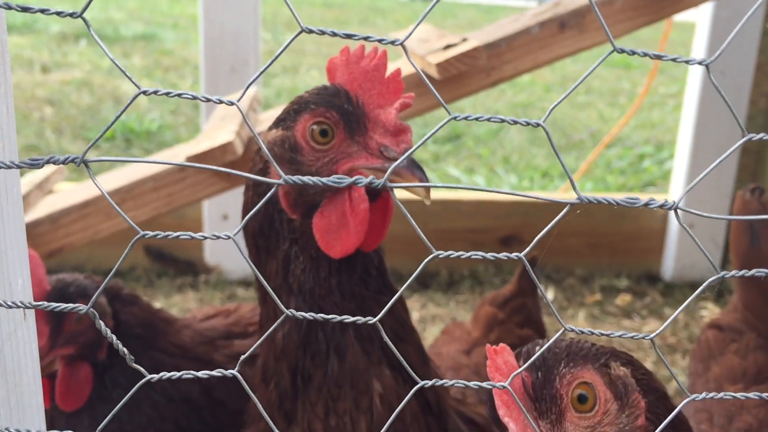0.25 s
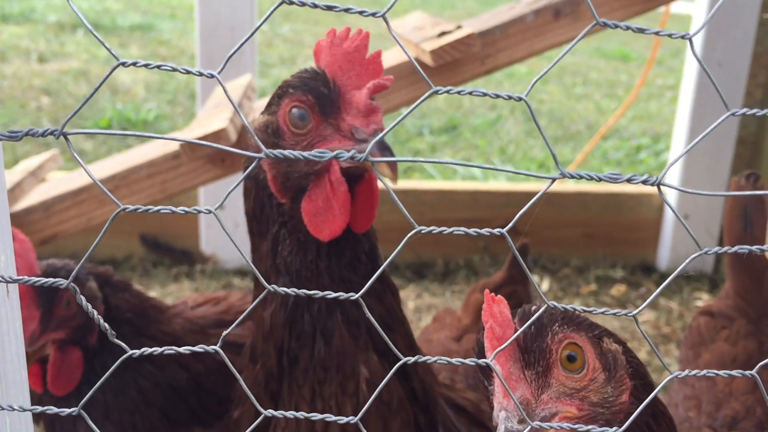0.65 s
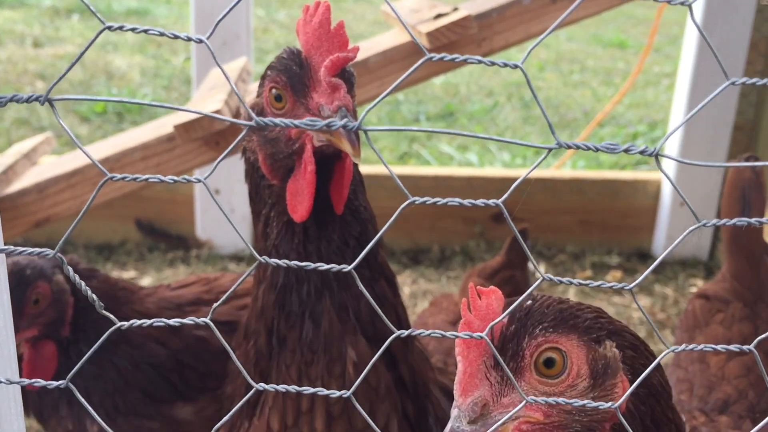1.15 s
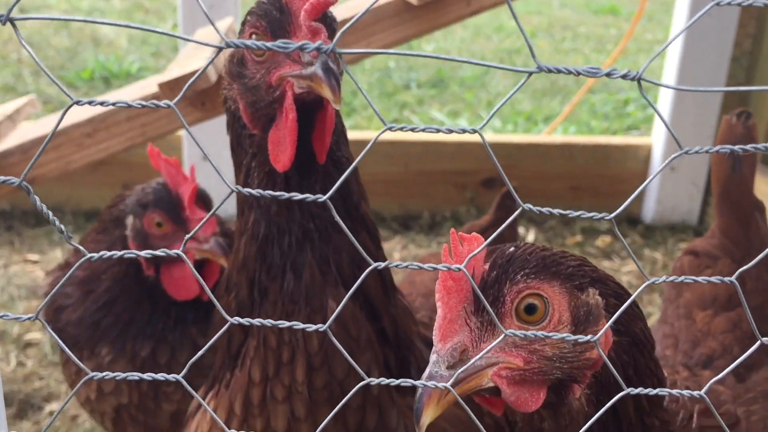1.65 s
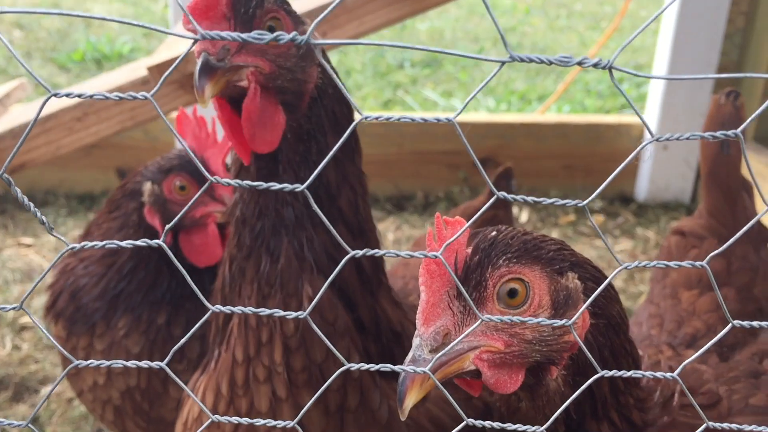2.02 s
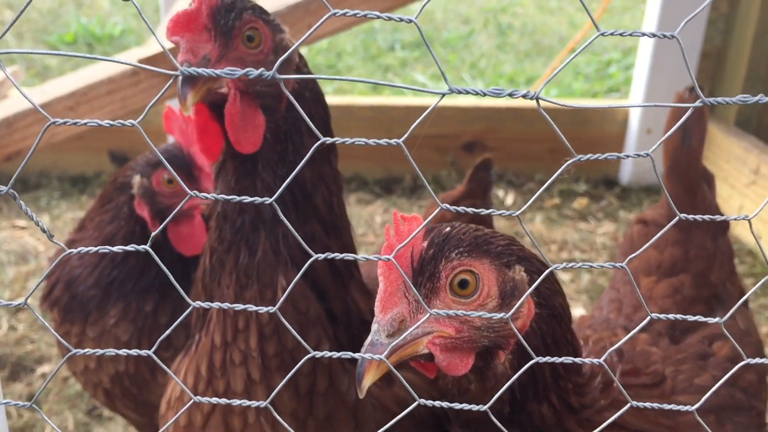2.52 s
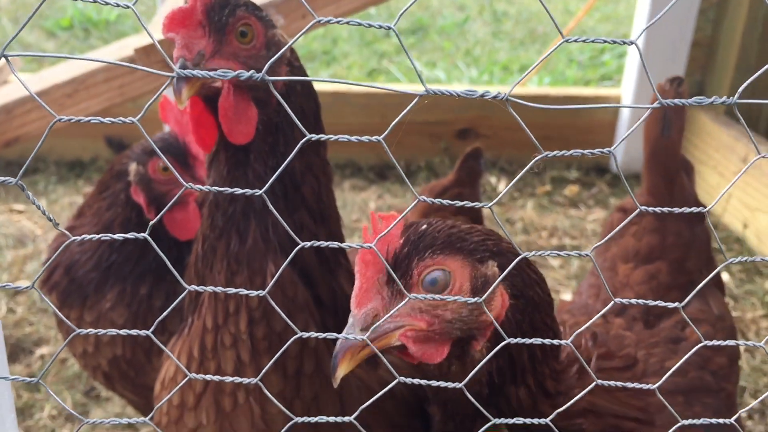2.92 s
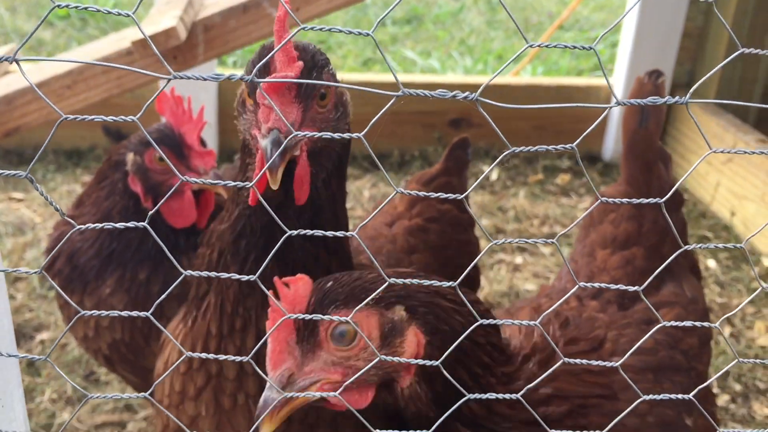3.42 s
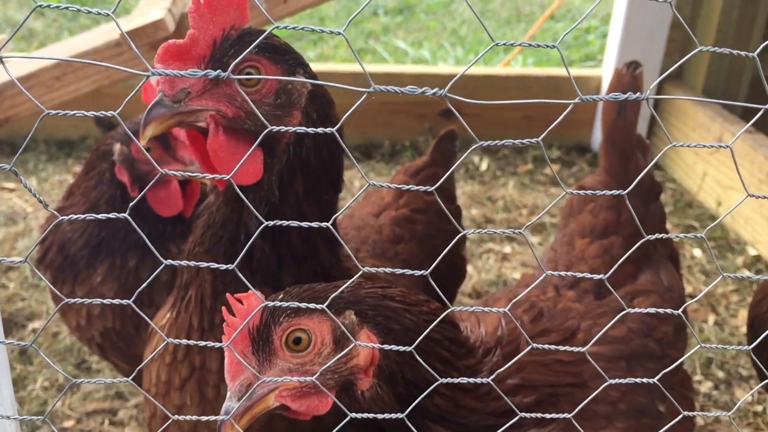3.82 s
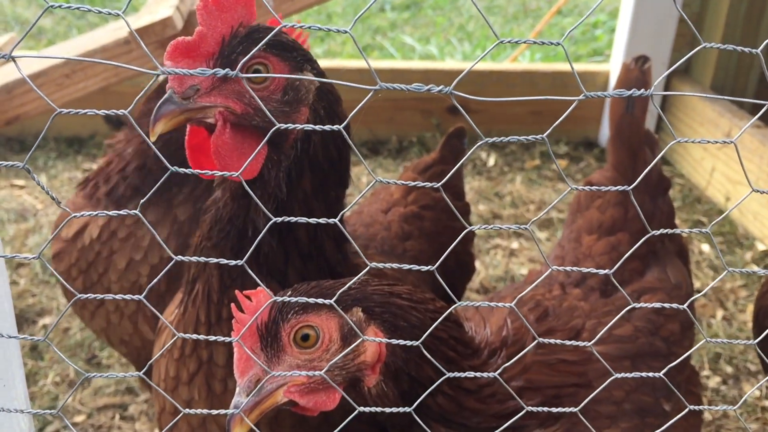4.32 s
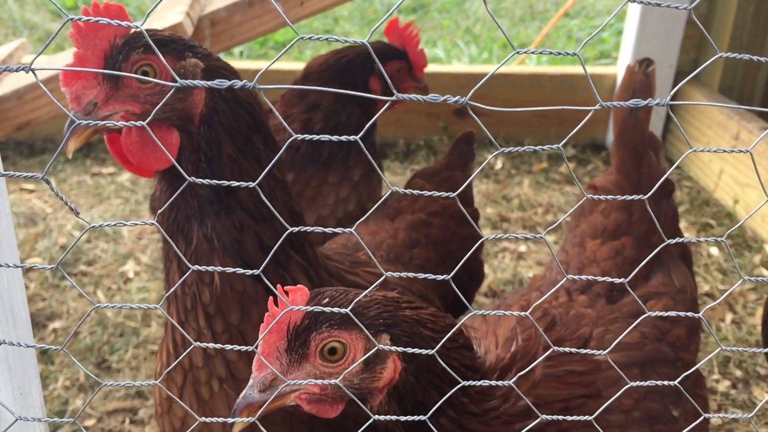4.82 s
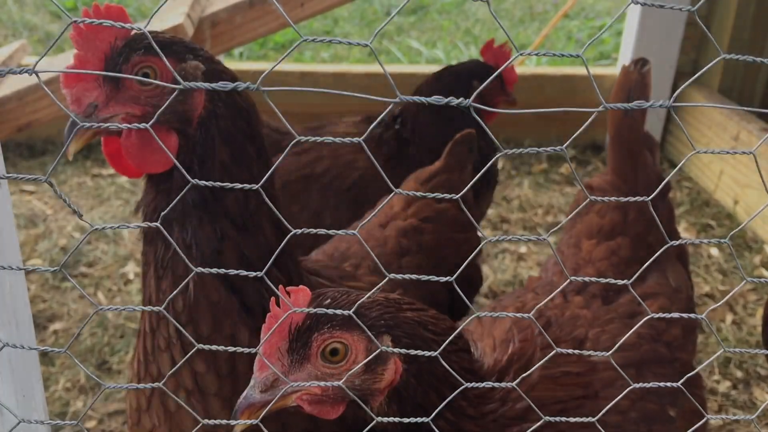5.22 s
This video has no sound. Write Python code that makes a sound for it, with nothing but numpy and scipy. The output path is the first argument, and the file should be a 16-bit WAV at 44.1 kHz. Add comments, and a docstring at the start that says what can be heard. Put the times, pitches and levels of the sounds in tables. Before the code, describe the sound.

Outdoors, close to several hens, a hand-held recorder is knocked with a quick cluster of low thumps. Hoarse, rattling croaks with whining tones fill the first two seconds, with rustling and small ticks, ending in a click and a loud short cluck. Then it grows quieter: a thin wavering whine and soft low clucks. A cricket chirps at a steady beat over faint insect hiss, light wind and a distant engine drone.

```python
"""An outdoor run: hens croak, cluck and whine close by, and the hand-held recorder is bumped at the start.
Hoarse pulses excite throat resonances for the croaks and clucks; gliding tones sing the notes and whine.
A cricket chirps in gated sine pulses at a steady beat over a far insect chorus of coloured noise.
Feathers and litter rustle and tick in noise grains and short rings; swelling low noise makes light wind
on the microphone, and a wavering tone with rumble makes the low drone of a distant engine."""
import sys
import numpy as np
from scipy import signal
from scipy.io import wavfile
from scipy.ndimage import uniform_filter1d

SR = 44100
rng = np.random.default_rng(int(sys.argv[2]) if len(sys.argv) > 2 else 0)


def wav_out(sig):
    """Save sig, one row per channel (or a flat mono array), as 16-bit PCM at SR to the path in sys.argv[1]."""
    wavfile.write(sys.argv[1], SR, np.round(np.clip(np.atleast_2d(sig).T, -1, 1) * 32767).astype(np.int16))


def gain_from_decibels(decibels):
    """Convert decibel values to linear amplitude factors."""
    exponent = np.asarray(decibels, float) / 20
    return 10 ** exponent


N = 241050  # samples in the scene

# hoarse croaks, one list each: (time [s], effort [dB], beak opening [0-1], upper resonance [Hz])
CROAK_PATHS = [
    [(0.0, -45.5, 0.89, 1435), (.18, -55, .6, 1414), (.366, -42.5, 0.6, 1400), (.4, -53, 0.96, 1480),
     (.444, -37.5, 0.38, 1382), (.88, -37, 0.63, 1520), (.93, -92, 0.6, 1530)],
    [(1.12, -54, 0, 1540), (1.174, -45.5, 0.4, 1580), (1.224, -43, 0.45, 1510), (1.4, -42.5, 0.76, 1493),
     (1.564, -41, 0.87, 1563), (1.6, -50, 0, 1480)],
    [(1.66, -49, .05, 1550), (1.71, -47, 0, 1530), (1.745, -43, 0, 1550), (1.77, -48, .2, 1580)],
    [(1.885, -42, 0.4, 1050), (1.92, -44, 0.52, 1190), (1.945, -47, 0.3, 1200)],
]
# upper throat resonances, for an upper resonance of 1450 Hz:
# (frequency [Hz], nominal width [Hz], relative level [dB])
BEAK_RESONANCES = [(2600, 190, 5), (3000, 98, -0.5), (3533, 190, 3.5), (3790, 330, 1)]
LOW_HZ, MIDDLE_HZ = 704, 1210  # the windpipe's lowest band and the fixed resonance above it
# what the beak lets out against the lowest band: (shut [dB], open [dB])
MIDDLE_DB, UPPER_DB, BEAK_DB = (-34, -4.5), (-18, 4.5), (-27.5, -11.5)

# hoarse tones of the two halves of the syrinx inside the croaks:
# (hoarseness [0-1], [(time [s], pitch [Hz], level [dB], octave against fundamental [dB])])
SYRINX_VOICES = [(0.638, [(0.0, 700, -48, -3), (.14, 712, -49.5, 4), (.23, 740.7, -43, 3),
                 (.37, 720, -43.5, -1.5), (.4, 760, -62.5, 21), (.43, 740, -41.5, 5), (.6, 735.5, -46, 2.5),
                 (.635, 753, -35.5, -7), (.69, 757, -42, -10), (.86, 763.5, -36, 0.5),
                 (.895, 760, -38, -8)]), (0.66, [(.145, 581, -55, -25), (.165, 628, -40, -16),
                 (.19, 665, -42.5, -4.5), (.25, 748, -36, -0.5), (.295, 846, -51, -10)]),
                 (0.86, [(.285, 650, -41.5, -17), (.433, 460, -52.5, -33), (.515, 573, -51, -8),
                 (.607, 637, -51, 1), (.687, 598, -40.5, -5), (.76, 652.6, -39.5, -12),
                 (.823, 582, -45.5, 1), (.92, 622, -45, -7.5)]), (.95, [(1.13, 748, -77, -22),
                 (1.19, 815, -47, -8), (1.3, 753.6, -49, 1), (1.38, 825, -51, -1.5),
                 (1.446, 770.6, -45, 2.5), (1.58, 749, -50, -1.5)]), (0.875, [(1.165, 567.5, -47.5, 3),
                 (1.2, 575, -49.5, -6), (1.36, 603, -41, -3), (1.447, 650, -48, 7), (1.507, 585, -39, -5),
                 (1.585, 650, -46.5, 2)])]

# short clucks: (start [s], peak [dB], nominal pitch [Hz], nominal length [s], brightness [dB])
CLUCK_EVENTS = [(1, -42.5, 272.4, 0.065, -7.5), (1.553, -29, 323, .014, 4), (1.956, -21, 312.6, 0.046, 1.5),
                (2.07, -51, 379, 0.034, -26), (2.51, -52, 275, 0.025, -20), (4.027, -50.5, 292, 0.032, -22),
                (4.228, -39, 261.8, .04, -22), (4.262, -45, 240, .03, -30), (4.519, -39, 293.4, .058, -20),
                (4.64, -52, 311, .022, -23), (4.708, -57, 340, 0.011, -19), (4.765, -52.5, 335, 0.014, -11),
                (4.834, -59, 400, .015, -18)]
# throat of a cluck at the neutral pitch: (frequency [Hz], nominal width [Hz], relative level [dB])
THROAT_RESONANCES = [(254, 230, -11.5), (662, 300, -4.5), (903, 290, -0.8), (1245, 600, -4.5),
                     (1744, 760, -7.5), (2900, 700, -20), (4030, 960, -25)]
# higher clucks come from a shorter throat and are cleaner
NEUTRAL_HZ, CLUCK_ROUGH, ROUGH_PER_OCTAVE = 322, 0.24, -1.3

# short sung notes: (start [s], length [s], first pitch [Hz], last pitch [Hz], first level [dB])
SUNG_NOTES = [(1.162, 0.12, 251, 270, -45), (1.58, 0.1, 686, 703, -47), (1.764, 0.16, 352.4, 364, -54.5),
              (3.267, 0.083, 960, 933, -55.5), (3.348, 0.096, 538, 525, -55), (3.435, 0.11, 638, 720, -53)]
NOTE_OCTAVE_DB, NOTE_HOARSE, NOTE_FADE_DB = -17, 0.52, -3.5
WINDPIPE_LIFT_DB, WINDPIPE_WIDTH_HZ = 19.5, 140  # lift of an octave in the windpipe's lowest band

# one long whine in three breaths: (time [s], pitch [Hz], level [dB], hoarseness [0-1])
WHINE_PATH = [(3.535, 854, -60, 0.4), (3.55, 816, -50, .3), (3.64, 806, -52.5, 0.44), (3.657, 802, -58, .5),
              (3.675, 770, -58.5, 0.84), (3.82, 788, -53.5, 0.42), (3.9, 780, -56.5, 0.88),
              (3.964, 770, -51, 0.38), (4.015, 765, -69, 0.8), (4.032, 773, -51, 0.42),
              (4.055, 773, -55, 0.37), (4.099, 788, -49.5, 0.23), (4.262, 766, -57.5, 0.4),
              (4.285, 786.5, -47, 0.23), (4.383, 815, -47.5, .2), (4.52, 787, -52.5, .12),
              (4.56, 791, -52, .1), (4.58, 790, -65, .2)]

# bumps on the recorder's case: (time [s], peak [dB], sign [+1 or -1], contact time [s])
CASE_BUMPS = [(.001, -16.5, -1, 0.0033), (0.016, -17.5, -1, 0.0062), (.028, -14.5, -1, 0.0025),
              (0.038, -5, 1, 0.0019), (0.041, -12, -1, 0.0022), (.05, -11, 1, 0.0027),
              (0.0619, -11, -1, 0.0018), (.084, -11, 1, 0.00516), (0.117, -13.5, 1, 0.0039),
              (0.129, -17, -1, 0.0022), (0.156, -24, 1, 0.0093), (0.17, -21, 1, 0.02)]
# modes of the case: (frequency [Hz], relative level [dB], time to fall 60 dB [s])
CASE_MODES = [(53.6, -13.5, 0.22), (93, -0.5, 0.1), (133.7, -2, .1), (218, 6, 0.039), (397, 3, 0.029),
              (514, 3.5, 0.036), (760, -17, .03)]

# cricket chirps: (middle [s], nominal peak [dB], length [pulses])
CRICKET_CHIRPS = [(.76, -49.5, 7.5), (1.185, -49, 4.5), (1.642, -47.5, 8.2), (2.03, -44, 8),
                  (2.432, -46, 7.6), (2.854, -43.5, 8.2), (3.27, -45.5, 7.6), (3.742, -44, 8.2),
                  (4.192, -43.5, 7.9), (4.632, -44, 7.5), (5.071, -47.5, 10)]
CHIRP_HZ, CHIRP_SAG_HZ, PULSES_PER_S = 7780, 342, 115
# pips of a lower insect: (start [s], peak [dB], frequency [Hz])
INSECT_PIPS = [(0.0164, -50, 5150), (0.0573, -58, 5110), (0.1281, -64, 5050), (0.3381, -53, 5110),
               (0.3718, -55, 5100), (0.4105, -60, 5170)]

# ticks of litter and wire:
# (start [s], first level [dB], ring [Hz], nominal width [Hz], time to fall 60 dB [s])
LITTER_TICKS = [(.168, -40.5, 14800, 3500, .02), (.4933, -32, 13600, 3000, 0.0055),
                (1.016, -51, 2600, 1500, 0.05), (1.08, -45, 8750, 1500, 0.09),
                (1.095, -39.5, 8640, 1500, 0.054), (1.13, -51, 3000, 800, 0.23),
                (1.737, -45, 14000, 3000, .015), (1.864, -42.5, 2340, 200, 0.029),
                (1.865, -47.5, 4900, 8100, 0.075), (1.9928, -26, 3480, 2050, 0.0072),
                (1.995, -43, 2900, 1210, .03), (1.9926, -48.5, 9000, 9000, .028),
                (2.0448, -40, 8400, 8000, .0076)]
# a bird shifts in feathers and straw: (peak time [s], peak [dB], 20 dB rise [s], 20 dB fall [s])
RUSTLE_SWELLS = [(.09, -58.5, 0.12, 0.064), (.17, -72, .08, .06), (.4, -48.5, 0.06, 0.23),
                 (.51, -53.5, .15, .4), (.88, -52, 0.2, 0.08), (1.11, -49, 0.14, 0.23),
                 (1.18, -48.5, 0.21, 0.077), (1.73, -57, .9, 0.21), (1.9, -56, .15, 0.052),
                 (2.0, -51, 0.066, .04), (2.03, -59, .03, 0.27)]
# spectrum of feathers and straw: (frequency [Hz], relative density [dB per Hz])
RUSTLE_SPECTRUM = [(300, 7), (2000, 13), (5000, 5), (9000, 9.5), (12000, 2), (15500, 6.5)]

# gusts on the microphone: (peak time [s], peak [dB], 20 dB rise [s], 20 dB fall [s])
WIND_GUSTS = [(.2, -42, 0.96, .15), (.62, -43, 0.16, 0.3), (1.03, -46.5, 0.82, 0.092),
              (1.14, -46.5, .07, .2), (1.37, -36, 0.21, 0.19), (1.64, -42.5, 0.095, 0.68),
              (2.73, -40.5, 0.038, 0.23), (3.54, -46, .05, 0.082), (3.7, -45.5, .04, 0.13),
              (4.02, -44.5, .09, 0.18), (4.46, -47, 0.49, 0.2), (4.84, -46, 0.05, 0.031),
              (4.94, -38.5, 0.06, 0.053), (5.06, -45, 0.038, 0.16), (5.17, -43.5, 0.15, 0.047),
              (5.29, -39.5, .08, 0.091), (5.44, -37.5, 0.078, 0.036)]
# spectrum of the wind: (frequency [Hz], relative density [dB per Hz])
WIND_SPECTRUM = [(25, -23), (40, -2.5), (60, 4), (100, -8), (160, -8), (230, -19), (300, -25), (420, -66),
                 (700, -55)]
BREEZE_DB = -53.5  # between gusts

# a distant engine: (time [s], tone level [dB])
DRONE_LEVELS = [(0.0, -42), (.3, -58), (.45, -49.5), (1.09, -61.5), (1.43, -49), (1.55, -64), (2.15, -61),
                (2.28, -47.5), (2.41, -62), (2.73, -46), (3.42, -42.5), (4.03, -54.5), (4.45, -54),
                (4.56, -60), (5.22, -57), (5.47, -66)]
DRONE_HZ = 131.3

# spectrum of far insects and hiss: (frequency [Hz], relative density [dB per Hz])
AIR_SPECTRUM = [(250, 4), (400, -2.5), (800, -4), (1500, -7.5), (3900, -14), (5100, -7), (5800, -17),
                (6700, 1), (7400, -4.5), (8500, -2), (9300, -13.5), (10400, -24), (11500, -20),
                (15700, -21.5)]
AIR_DB = -54.5


def evened(x):
    """Normalisation: scales a signal to rms 1."""
    return x / np.sqrt(np.mean(x ** 2) + 1e-20)


def add(mix, s, sound):
    """Superposition: adds a sound to the mix at s seconds."""
    part = mix[max(round(s * SR), 0):][:len(sound)]
    part += sound[:len(part)]


def curves(rows):
    """Linear interpolation: the start time, and each further column sample by sample."""
    s, *columns = np.transpose(rows)
    t = np.arange(s[0], s[-1], 1 / SR)
    return s[0], [np.interp(t, s, column) for column in columns]


def level(rows):
    """Level interpolated in dB over the scene, practically silent after the last row."""
    s, db = np.transpose(rows)
    return gain_from_decibels(np.interp(np.arange(N) / SR, s, db, right=-120))


def swells(rows):
    """Addition of powers: each swell rises to its peak and falls evenly in dB."""
    t = np.arange(N) / SR
    power = 0
    for s, db, rise, fall in rows:
        distance = np.where(t < s, (s - t) / rise, (t - s) / fall)
        power = power + gain_from_decibels(db - 20 * distance) ** 2
    return np.sqrt(power)


def wobble(size, span_s):
    """Random fluctuation: white noise smoothed twice over a span, at rms 1."""
    width = max(round(span_s * SR), 1)
    smooth = uniform_filter1d(rng.standard_normal(size), width)
    return evened(uniform_filter1d(smooth, width))


def resonate(x, hz, width_hz):
    """Heterodyne resonance: shifts hz to zero, smooths twice, shifts back, with peak gain 1."""
    turn = np.exp(2j * np.pi * np.cumsum(hz * np.ones(len(x))) / SR)
    r = np.exp(-np.pi * width_hz / SR)
    smooth = signal.lfilter([(1 - r) ** 2], [1, -2 * r, r * r], x / turn)
    return 2 * (turn * smooth).real


def resonate_twice(x, hz, width_hz):
    """Cascaded resonance: two passes steepen the sides of the band."""
    return resonate(resonate(x, hz, width_hz), hz, width_hz)


def noise(colour, patchy_db, size=1024):
    """Spectral synthesis: random short-time spectra with a given colour and drifting patches."""
    hop, hz = size // 4, np.fft.rfftfreq(size, 1 / SR)
    real, imag, patches = rng.standard_normal((N // hop + 5, len(hz), 3)).T
    patches = uniform_filter1d(patches, size=10, axis=0)
    patches = evened(uniform_filter1d(patches, size=10, axis=1))
    f, db = np.transpose(colour)
    colour_db = np.interp(np.log(hz + 1), np.log(f + 1), db)[:, None]
    spectra = (real + 1j * imag) * gain_from_decibels(colour_db + patchy_db * patches)
    return evened(signal.istft(spectra, nperseg=size, noverlap=size - hop)[1][:N])


def folds(per_s, jitter, rough, uneven_db):
    """Membrane oscillation: uneven snaps, each followed by a puff of turbulent air."""
    turns = np.cumsum(per_s * (1 + jitter * wobble(len(per_s), 0.004))) / SR + 0.9
    snaps = np.diff(np.floor(turns), prepend=0) * gain_from_decibels(uneven_db * rng.standard_normal(len(turns)))
    puffs = (0.61 + np.exp(-(turns % 1) / 0.54)) * rng.standard_normal(len(turns))
    rough = np.clip(rough, 0, 1)
    return (1 - rough) * evened(snaps) + rough * evened(puffs)


def tone(hz, db, octave_db, hoarse):
    """Phase-locked harmonics: hoarseness makes pitch and strength tremble and throb."""
    angle = 2 * np.pi * np.cumsum(hz * (1 + 0.0304 * hoarse * wobble(len(hz), 0.009))) / SR
    throb = np.sin(2 * np.pi * np.cumsum(125 + 25 * wobble(len(hz), 0.00854)) / SR)
    flutter = 1 + hoarse * (0.68 * wobble(len(hz), 0.0073) + 0.49 * throb)
    sung = gain_from_decibels(db) * (np.sin(angle) + gain_from_decibels(octave_db) * np.sin(2 * angle))
    return np.sqrt(2) * sung * flutter * signal.windows.tukey(len(hz), 700 / len(hz))


def croak(rows):
    """Source and filter: the rasp of the syrinx rings the windpipe and the open beak."""
    s, (db, opening, upper_hz) = curves(rows)
    middle_db, upper_db, beak_db = (shut + (wide - shut) * opening
                                    for shut, wide in (MIDDLE_DB, UPPER_DB, BEAK_DB))
    drive = folds(np.full(len(db), 122.), jitter=0.1, rough=0.51, uneven_db=3.5)
    sound = evened(resonate_twice(drive, LOW_HZ, 367))
    sound = sound + gain_from_decibels(middle_db) * evened(resonate_twice(drive, MIDDLE_HZ, 690))
    sound = sound + gain_from_decibels(upper_db) * evened(resonate_twice(drive, upper_hz, 740))
    shift = (upper_hz / 1450) ** 0.98  # the beak's resonances move with the upper one
    beak = sum(gain_from_decibels(level_db) * resonate(drive, hz * shift, width)
               for hz, width, level_db in BEAK_RESONANCES)
    ragged = gain_from_decibels(3.1 * wobble(len(db), 0.013))  # the high rasp comes in bursts
    sound = sound + gain_from_decibels(beak_db) * evened(ragged * beak)
    return s, gain_from_decibels(db) * sound * signal.windows.tukey(len(db), 600 / len(db))


def voice(hoarse, rows):
    """Independent oscillation: one half of the syrinx sings its own tone inside a croak."""
    s, columns = curves(rows)
    return s, tone(*columns, hoarse)


def cluck(s, db, hz, length, bright_db):
    """Source and filter: snaps ring the throat; upper resonances follow effort more steeply."""
    mouth = hz / NEUTRAL_HZ
    rough = CLUCK_ROUGH + ROUGH_PER_OCTAVE * np.log2(mouth)
    u = np.arange(round(1.2 * length * SR)) / (length * SR)
    peak = 0.5 * np.clip(1 - u, 0, 1) + 0.55 * np.exp(-((u - 0.4) / 0.29) ** 2)
    effort = np.minimum(u / 0.018, 1) * peak
    drive = folds(hz * (1.04 - 0.088 * u), jitter=0.037, rough=rough, uneven_db=2.5)
    sound = 0
    for k, (f, width, level_db) in enumerate(THROAT_RESONANCES):
        # brightness acts by half on the third resonance and fully above it
        gain = gain_from_decibels(level_db + bright_db * np.clip(k - 1, 0, 2) / 2)
        ring = resonate_twice(drive * effort ** (1 + 0.43 * k), f * mouth, width)
        sound = sound + (-1) ** k * gain * ring  # neighbouring resonances are of opposite sign
    return s, gain_from_decibels(db) * sound / abs(sound).max()


def note(s, length, first_hz, last_hz, db):
    """Frequency glide: a straight, slightly fading tone whose octave the windpipe can lift."""
    u = np.linspace(0, 1, round(length * SR))
    hz = first_hz + (last_hz - first_hz) * u
    lift_db = WINDPIPE_LIFT_DB * np.exp(-((2 * hz - LOW_HZ) / WINDPIPE_WIDTH_HZ) ** 2)
    return s, tone(hz, db + NOTE_FADE_DB * u, NOTE_OCTAVE_DB + lift_db, NOTE_HOARSE)


def whine():
    """Frequency and amplitude modulation: the long thin whine of a hen further back."""
    s, (hz, db, hoarse) = curves(WHINE_PATH)
    return s, tone(hz, db, NOTE_OCTAVE_DB, hoarse)


def bump(s, db, sign, contact):
    """Impact excitation: a soft push rings the low modes of the case."""
    t = np.arange(SR // 5) / SR
    ring = sum(gain_from_decibels(level_db - 60 * t / t60) * np.cos(2 * np.pi * hz * t)
               for hz, level_db, t60 in CASE_MODES)
    push = np.hanning(max(round(contact * SR), 3))
    sound = np.convolve(ring, push)
    return s - contact / 2, sign * gain_from_decibels(db) * sound / abs(sound).max()


def chirp(s, db, pulses):
    """Stridulation: wing strokes gate a tone whose pitch arches up to the middle of the chirp."""
    length = pulses / PULSES_PER_S
    u = np.linspace(-1, 1, round(length * SR))
    stroke = (u * pulses / 2 + 0.5) % 1
    hz = CHIRP_HZ - CHIRP_SAG_HZ * u ** 2
    hz = hz - 120 * (stroke - 0.3) + 60 * wobble(len(u), 0.0051)
    gate = np.sin(np.pi * np.minimum(stroke / 0.83, 1)) ** 0.86
    gate = gate * gain_from_decibels(0.87 * wobble(len(u), 0.0018))
    return s - length / 2, gain_from_decibels(db - 5.2 * u ** 2) * gate * np.sin(2 * np.pi * np.cumsum(hz) / SR)


def pip(s, db, hz):
    """Stridulation: one short wing stroke, a windowed sine."""
    t = np.arange(round(0.011 * SR)) / SR
    return s, gain_from_decibels(db) * np.sin(2 * np.pi * hz * t) * signal.windows.tukey(len(t), 0.6)


def tick(s, db, hz, width_hz, t60):
    """Damped resonance: a dying puff of noise in a broad ring."""
    t = np.arange(SR // 10) / SR
    ring = evened(resonate(rng.standard_normal(len(t)), hz, width_hz))
    return s, gain_from_decibels(db) * ring * gain_from_decibels(-60 * t / t60) * np.minimum(t / 0.0013, 1)


def rustle():
    """Friction noise: dense crackle of feathers and straw, swelling as the birds move."""
    grains = gain_from_decibels(0.4 * wobble(N, 0.0019))
    return swells(RUSTLE_SWELLS) * evened(grains * noise(RUSTLE_SPECTRUM, patchy_db=2.5, size=256))


def yard(x):
    """Scattering: short sparse echoes from posts and ground."""
    t = np.arange(SR // 4) / SR
    sparse = (rng.random(len(t)) < 0.05) * (t > 0.004)
    taps = rng.choice([-1., 1.], len(t)) * sparse * gain_from_decibels(-60 * t / 0.23)
    return signal.fftconvolve(x, taps / np.linalg.norm(taps))[:N]


def wind():
    """Turbulent pressure: lumpy low noise on the microphone, gusts added to a breeze in power."""
    lumps = gain_from_decibels(0.42 * wobble(N, 0.019))
    pressure = evened(lumps * noise(WIND_SPECTRUM, patchy_db=2.0, size=2048))
    return np.hypot(gain_from_decibels(BREEZE_DB), swells(WIND_GUSTS)) * pressure


def drone():
    """Narrow-band radiation: a wavering engine tone, partly smeared to noise, under a broad rumble."""
    angle = 2 * np.pi * np.cumsum(DRONE_HZ + 1.63 * wobble(N, 0.09)) / SR
    smear = evened(resonate(rng.standard_normal(N), DRONE_HZ, 47))
    rumble = evened(resonate_twice(rng.standard_normal(N), 166, 158))
    return level(DRONE_LEVELS) * (np.sqrt(2) * np.sin(angle) + 0.48 * smear + 0.4 * rumble)


def air():
    """Incoherent summation: far insects and hiss merge into steady coloured noise."""
    return gain_from_decibels(AIR_DB) * noise(AIR_SPECTRUM, patchy_db=1.38)


def scene():
    """Superposition: birds, insects and ticks with the yard's echo, then the sounds without echo."""
    near, case = np.zeros(N), np.zeros(N)
    for rows in CROAK_PATHS:
        add(near, *croak(rows))
    add(near, *whine())
    for source, table in ((voice, SYRINX_VOICES), (cluck, CLUCK_EVENTS), (note, SUNG_NOTES),
                          (chirp, CRICKET_CHIRPS), (pip, INSECT_PIPS), (tick, LITTER_TICKS)):
        for row in table:
            add(near, *source(*row))
    for row in CASE_BUMPS:
        add(case, *bump(*row))
    echo = gain_from_decibels(-17) * yard(near)
    return (near + echo + case + rustle() + wind() + drone() + air())[None]


def low_pass(x):
    """Removes everything above the highest recorded frequency."""
    return signal.sosfilt(signal.butter(12, 15750, fs=SR, output="sos"), x)


def record(dry):
    """High-pass response: the microphone drops the deepest bass, below about 40 Hz."""
    high_pass = signal.butter(3, 40, "high", fs=SR, output="sos")
    mix = signal.sosfilt(high_pass, dry)
    return low_pass(mix)


dry = scene()
out = record(dry)
wav_out(out)
```